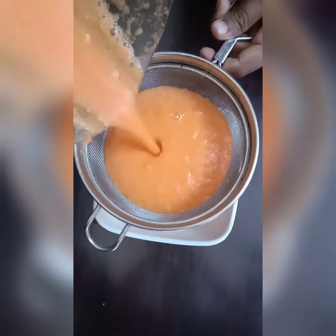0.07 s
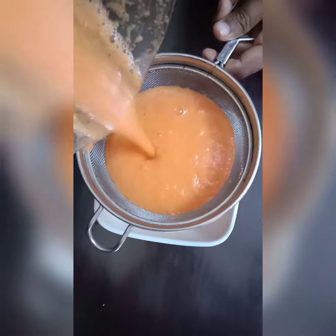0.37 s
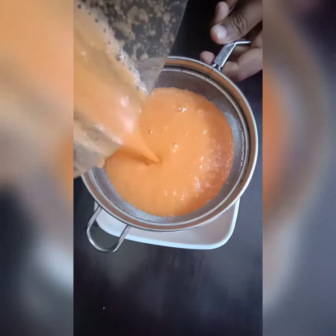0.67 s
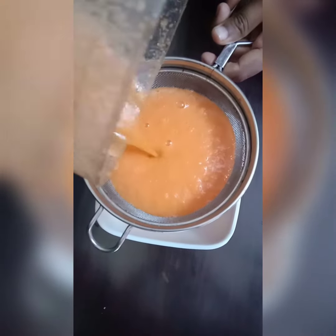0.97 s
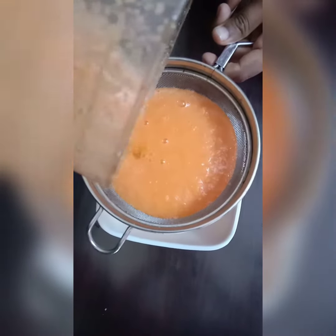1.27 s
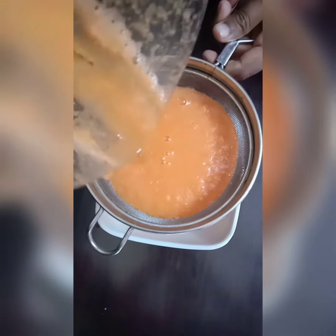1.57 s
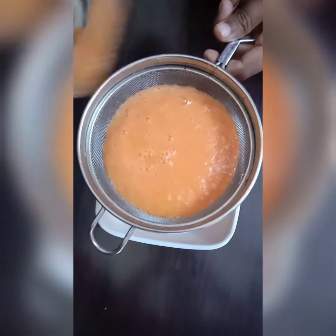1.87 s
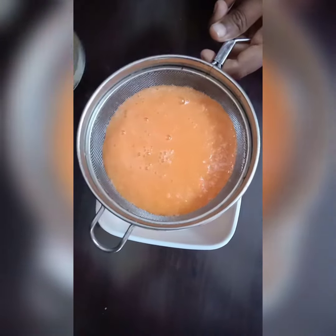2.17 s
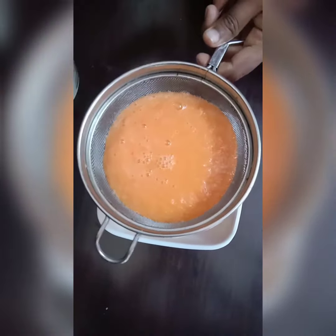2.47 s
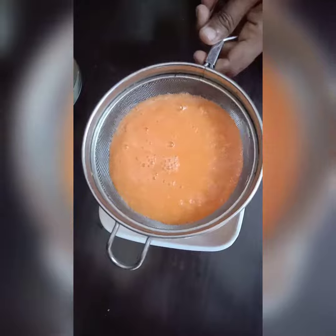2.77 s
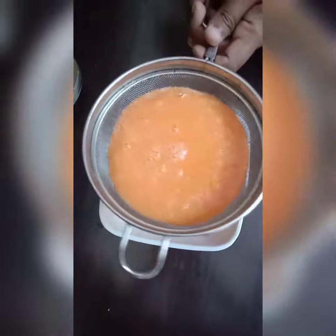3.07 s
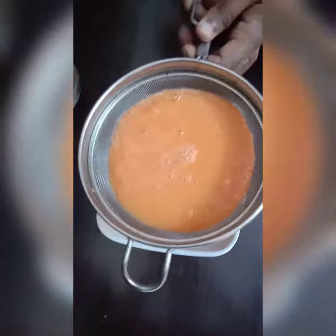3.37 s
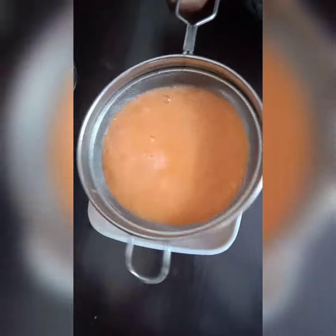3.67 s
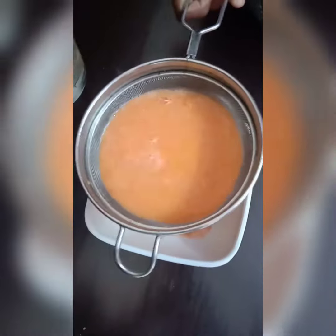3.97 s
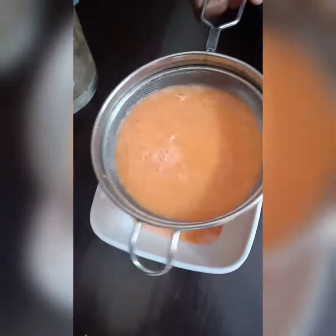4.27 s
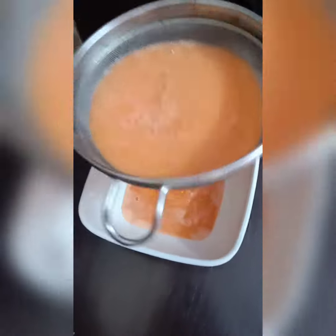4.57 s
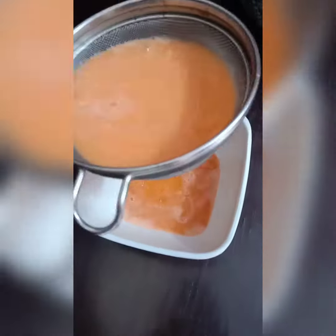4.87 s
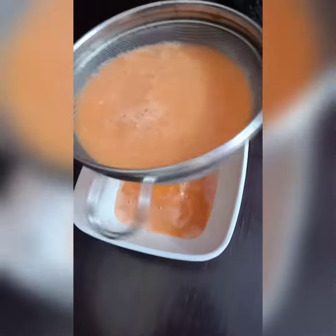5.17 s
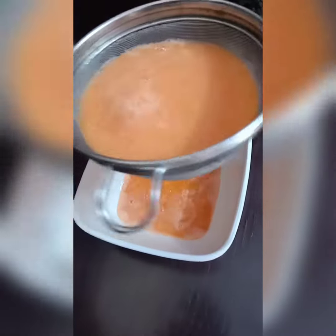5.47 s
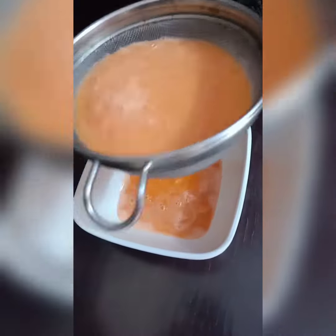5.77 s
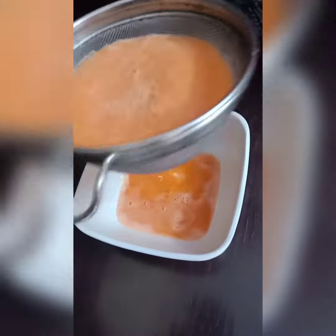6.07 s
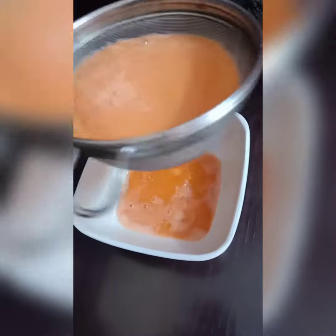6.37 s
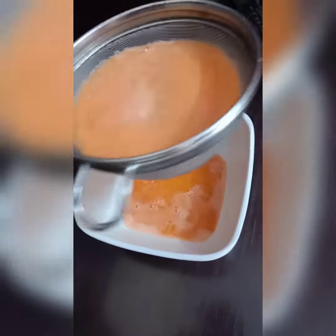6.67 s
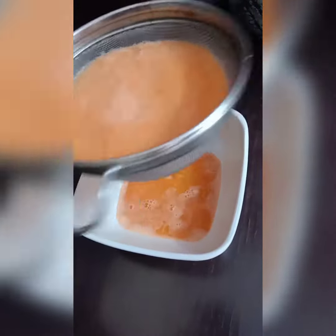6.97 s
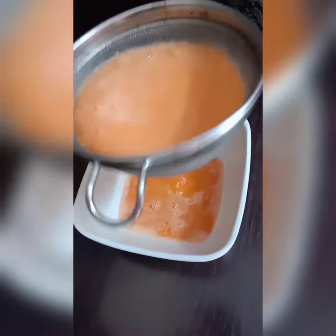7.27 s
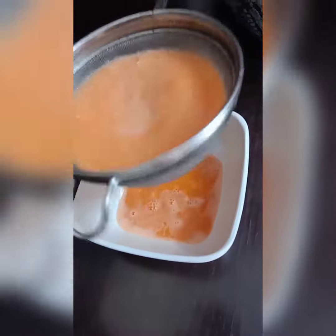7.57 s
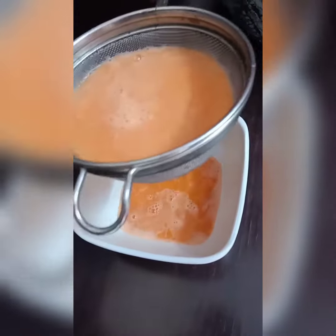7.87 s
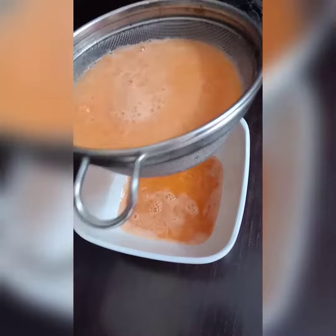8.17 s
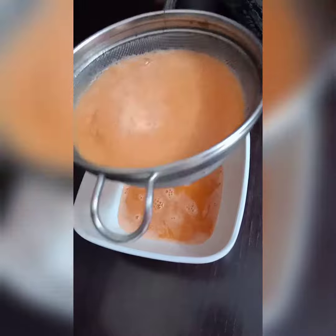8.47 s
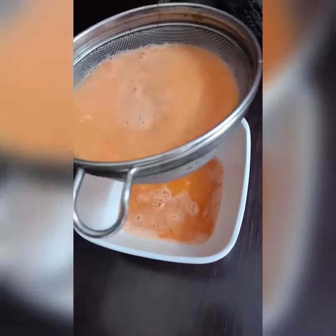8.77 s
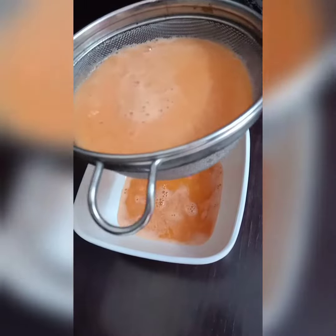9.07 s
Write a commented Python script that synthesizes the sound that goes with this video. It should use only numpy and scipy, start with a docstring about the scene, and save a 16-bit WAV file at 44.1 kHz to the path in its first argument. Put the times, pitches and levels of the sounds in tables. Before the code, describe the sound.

Thick juice pours through a metal strainer into a bowl, close to the microphone in a quiet, hard-walled kitchen. During the first second it gulps softly and squelches, with a short spray hiss near 0.4 seconds. A few drops and sharp foam ticks follow. From about 2.1 to 2.6 seconds the emptied jug thumps down and rocks on the table in a quick run of dull knocks, the loudest event. A brief high squeak comes at 2.8 seconds, a fainter one at 3.7. Irregular drops then splat and plip, lightly ringing the bowl, busiest between 4 and 5 seconds, with a stronger splat at 5.4. Wet pulp squelches around 6.5 seconds, mostly falling in pitch, followed by more splats. Lighter dripping continues until about 9 seconds. Fine foam crackle runs throughout over a faint low room hum, joined after the jug lands by a soft rumble from handling the strainer.

```python
"""Thick juice pouring through a metal strainer into a bowl, close to a phone microphone in a quiet,
hard-walled kitchen. The pour gulps and hisses, drops splat and ring the bowl, trapped bubbles plip,
foam films burst on the wet mesh, and the pulp squelches, mostly sinking in pitch. About two seconds
in, the emptied jug is set down, rocks on the table and squeaks. The strainer is then worked by hand
with a soft rumble and drips on, over a low room hum."""
import sys
import numpy as np
from scipy import signal
from scipy.fft import rfft, irfft
from scipy.io import wavfile
from scipy.ndimage import uniform_filter1d

SR = 44100
rng = np.random.default_rng(int(sys.argv[2]) if len(sys.argv) > 2 else 0)


def master(y):
    """Save y as 16-bit WAV."""
    cut = np.clip(np.atleast_2d(y).T, -1, 1)
    pcm = np.round(cut * 32767)  # scale
    wavfile.write(sys.argv[1], SR, pcm.astype(np.int16))


N = 406161
T = np.arange(N) / SR

# Levels in all tables are relative: each layer has its own gain.
# big drops landing in the bowl: t/s, splash level/dB, hollow body against the splash/dB
DROPS = [(1.227, -52.5, -8.5), (1.247, -52.5, -11.5), (1.33, -51.5, -7.5), (1.42, -55, -25),
         (2.861, -54, -2.5), (3.12, -47.5, -9), (3.206, -49.5, -8), (3.629, -52.5, -25),
         (3.765, -54.5, -2.5), (3.81, -53, -7), (3.855, -61.5, 6.5), (3.939, -54.5, -10.5),
         (4.039, -48.5, -13.5), (4.115, -44.5, -37), (4.256, -53.5, -2), (4.299, -50.5, 2),
         (4.353, -59, 11.5), (4.43, -45, -12.5), (4.454, -40, -8.5), (4.467, -48.5, -6), (4.483, -45, -8),
         (4.744, -53.5, 1), (4.759, -45.5, -1), (4.876, -44.5, -7), (4.9, -47.5, 2.5), (4.926, -43.5, -8),
         (4.944, -45, -4), (4.972, -51.5, 3.5), (5.003, -54, -0.5), (5.131, -50.5, -12), (5.436, -30, -11),
         (5.532, -59.5, 1), (5.796, -50.5, -3.5), (5.974, -64.5, 17), (6.221, -53, -5), (6.257, -49.5, 0.5),
         (6.269, -55, 3.0), (6.308, -56, 2.5), (6.509, -57, -24), (6.862, -43, -8.5), (6.941, -39, -4.5),
         (6.963, -54, 9.5), (7.152, -54, 4.5), (7.203, -61, 12.5), (7.393, -68.5, 16.5),
         (7.411, -64.5, 11.5), (7.484, -53, 5), (7.521, -48, -6.5), (7.587, -55.5, -14.5),
         (7.843, -50.5, -8.5), (7.856, -58, -13.0), (7.942, -56, -7), (7.964, -60.5, 9), (8.039, -66, 11.5),
         (8.091, -51.5, -16.0), (8.315, -50.5, 2), (8.46, -54.5, 3.5), (8.478, -53.5, 8.5),
         (8.511, -54, -1), (8.729, -54.5, 5), (8.765, -51, -6), (8.888, -67.5, 14.5), (9.055, -53, -4.5)]
# strength of the draining: t/s, patter level/dB, fizz level/dB
DRAINING = [(0, -34, -66.5), (0.33, -90, -77.5), (0.51, -54.5, -69), (0.97, -58.5, -66.5),
            (1.25, -54.5, -72), (1.61, -69, -58), (1.9, -59, -83.5), (2.13, -63.5, -87), (2.28, -63, -52.5),
            (2.48, -53.5, -83.5), (2.94, -55, -59.5), (3.41, -58.5, -69), (3.87, -59, -66.5),
            (4.48, -50, -63.5), (4.67, -60, -70), (4.9, -55, -56), (5.3, -48.5, -68.5),
            (5.64, -60.5, -74.5), (6.15, -71.5, -67), (6.45, -62, -60.5), (6.74, -56, -58.5),
            (7.07, -50.5, -62.5), (7.45, -58, -71), (7.75, -68, -65.5), (8.07, -44, -59),
            (8.27, -68.5, -74.5), (8.89, -47, -70.5), (9.2, -90, -95.5)]
# spectrum of juice landing: f/Hz, level/dB
SPLAT_SPECTRUM = [(300, -7), (750, -17), (1050, -0.5), (1700, 9), (2400, -2), (3100, 1), (4300, 2.5),
                  (5200, -14), (8000, -9), (10000, -26)]
# spectrum of bursting foam: f/Hz, level/dB
FOAM_SPECTRUM = [(3500, -18), (5500, -8.5), (7800, -3.5), (9500, -18.5), (11500, -22), (13000, -8.5),
                 (16000, -7.5)]


def amp(db):
    """Decibels to gain."""
    return 10 ** (np.asarray(db) / 20)


def unit(x):
    """Scale to rms 1."""
    return x / (np.std(x) + 1e-12)


def crest(x):
    """Scale to peak 1."""
    return x / (np.abs(x).max() + 1e-12)


def add(out, s, x):
    """Mix x into out from time s."""
    i = max(int(s * SR), 0)
    out[i:i + len(x)] += x[:N - i]


def curve(rows, column=1):
    """Gain that follows one dB column of a table over time."""
    rows = np.array(rows)
    return amp(np.interp(T, rows[:, 0], rows[:, column]))


def colour(x, points):
    """Shape x with a spectrum of points: f/Hz, level/dB."""
    hz, db = np.transpose(points)
    f = np.maximum(np.fft.rfftfreq(len(x), 1 / SR), 1)
    return irfft(rfft(x) * amp(np.interp(np.log(f), np.log(hz), db)), len(x))


def resonate(x, hz, width_hz):
    """Two-pole band-pass, gain 1 at the centre."""
    return signal.lfilter(*signal.iirpeak(hz, hz / width_hz, SR), x)


def fade(t, t60):
    """Exponential decay by 60 dB in t60 seconds."""
    return np.exp(-np.log(1000) * t / t60)


def wobble(t, samples):
    """Random motion of rms 1, smoothed over so many samples."""
    return unit(uniform_filter1d(rng.standard_normal(len(t)), samples))


def specks(per_s, spread_db, size=N):
    """Random tiny impacts, a few much larger than the rest."""
    strength = amp(spread_db * np.minimum(rng.exponential(size=size), 4))
    return (rng.random(size) < per_s / SR) * strength * rng.choice([-1, 1], size)


def spurts(depth_db):
    """Sticky pulp lets go irregularly: a gain that wanders over tens of milliseconds."""
    return amp(depth_db * unit(uniform_filter1d(wobble(T, 900), 500)))


def bubble(hz, t60, glide, attack_s):
    """A trapped bubble rings and rises in pitch as it nears the surface."""
    t = T[:4096]
    pitch = hz * (1 + glide * np.minimum(t / t60, 1))
    tone = np.sin(2 * np.pi * np.cumsum(pitch) / SR)
    return crest(tone * fade(t, t60) * (1 - np.exp(-t / attack_s)))


def tiny_bubbles(times, hz, gains, cycles):
    """Each bubble rings a few cycles of its own pitch with a rounded start."""
    turns = np.outer(hz, T[:400])
    age = turns / cycles
    waves = gains[:, None] * age * np.exp(-age) * np.sin(2 * np.pi * turns)
    place = (times * SR).astype(int)[:, None] + np.arange(turns.shape[1])
    return np.bincount(place.ravel(), waves.ravel(), N)[:N]


def bowl(x, stretch=1):
    """The hollow between bowl and strainer rings on after whatever lands in it."""
    # resonances of the hollow: f/Hz, width/Hz, level/dB
    modes = [(504, 25, 4), (1016, 32, 8.5), (1561, 20, 5.5), (1731, 35, -2), (1895, 29, 3.5), (2093, 30, 2),
             (2450, 77, -7.5), (2855, 52, -4), (3035, 52, 1.5), (3280, 61, -2.5), (3940, 120, -5),
             (4550, 140, -8)]
    return sum(amp(db) * resonate(x, hz * stretch, width) for hz, width, db in modes)


def room_hum(hz=99, width_hz=22):
    """A low hum wavers in the room: one narrow band of noise."""
    # course of the hum: t/s, level/dB
    levels = [(0, -65), (1, -69), (1.95, -69), (2.95, -73), (6.6, -63.5), (9.2, -78.5)]
    band = resonate(rng.standard_normal(N), hz, width_hz)
    return unit(resonate(band, hz, width_hz)) * curve(levels)


def still_air():
    """The kitchen's faint, steady room tone."""
    # spectrum of the air: f/Hz, level/dB
    spectrum = [(25, -3.5), (97, -0.5), (200, 3.5), (700, -14.5), (1000, -5), (1300, -18.5), (1700, 1),
                (2500, -41.5), (4400, 0.5), (5200, -32.5), (8000, -25), (10000, -36), (16000, -38.5)]
    return unit(colour(rng.standard_normal(N), spectrum))


def squelches(rise_share=0.28, skirt_db=-25, droop_db=-3, widening=0.22, surge_db=2.5):
    """Dense tiny pops ring a resonance that widens, and mostly sinks in pitch, as it dies away."""
    # squelches: t/s, length/s, starting f/Hz, sink/(octaves per s), width/Hz, level/dB
    events = [(0, 0.031, 3700, 0.5, 403, -43), (0.028, .16, 3920, 1.35, 454, -55.5),
              (0.272, 0.055, 4080, 1, 119, -59), (0.281, 0.12, 3410, 6, 230, -49.5),
              (0.538, 0.097, 3430, 0.8, 372, -42), (0.657, 0.24, 1813, 2.24, 237, -62.5),
              (1.368, 0.28, 3333, 2.5, 480, -50.5), (1.57, 0.09, 3100, 0.5, 302, -46),
              (1.616, .11, 3583, 1, 805, -46.5), (2.077, 0.17, 3684, 3, 418, -50),
              (2.205, 0.093, 3420, -1.5, 450, -48), (2.34, 0.12, 3494, 4, 387, -50.5),
              (2.566, 0.23, 5070, 2.4, 500, -48), (2.677, 0.12, 2402, 4, 656, -50),
              (2.935, 0.15, 3680, 4, 490, -45.5), (3.199, 0.072, 2857, 0.5, 703, -53),
              (3.78, .15, 2185, 0, 460, -60), (5.213, 0.13, 5034, 2.4, 340, -48.5),
              (5.768, 0.12, 3350, 5, 744, -56), (6.518, 0.038, 4470, 2.5, 260, -33),
              (6.566, 0.061, 3760, -0.4, 405, -35), (6.631, .14, 3717, 2.5, 590, -37.5),
              (7.215, 0.25, 2123, 1, 231, -58.5), (7.234, 0.13, 5390, 2.5, 380, -51),
              (7.725, 0.12, 1464, -0.5, 134, -67), (8.483, 0.069, 2580, 4.5, 600, -49),
              (8.87, 0.15, 5530, 3, 342, -57)]
    # spectrum over all squelches: f/Hz, level/dB
    spectrum = [(1000, -7.5), (1600, 2), (2400, -2), (3200, -2), (4400, 3), (5100, -6), (6000, 6)]
    out, t = np.zeros(N), T[:20480]
    for s, length, first_hz, sink, width, db in events:
        impacts = specks(per_s=1500, spread_db=2, size=len(t))
        pops = np.fft.fft(impacts * np.exp(2j * np.pi * rng.random(len(t))))
        # the band is built around 0 Hz, then carried up to the gliding pitch
        offset = np.fft.fftfreq(len(t), 1 / SR) / width
        narrow = np.fft.ifft(pops * (np.exp(-offset ** 2 / 2) + amp(skirt_db) * np.exp(-offset ** 2 / 20)))
        wide = np.fft.ifft(pops * np.exp(-offset ** 2 / 8))
        progress = np.minimum(t / length, 1)
        band = narrow + widening * progress * (wide - narrow)
        hz = first_hz * 2 ** (-sink * length * progress)
        hiss = (band * np.exp(2j * np.pi * np.cumsum(hz) / SR)).real
        surge = amp(surge_db * wobble(t, 350))
        swell = np.sin(np.pi / 2 * np.minimum(progress / rise_share, 1)) * amp(droop_db * progress)
        release = fade(np.maximum(t - length, 0), t60=0.092)
        add(out, s, amp(db) * unit(hiss * surge) * swell * release)
    return colour(out, spectrum)


def patter(ring_db=9):
    """Pulp crackles in sticky clusters and keeps the bowl faintly ringing."""
    impacts = specks(per_s=1300, spread_db=3.5) * spurts(depth_db=5.5)
    pops = colour(resonate(impacts, 2600, 4700), SPLAT_SPECTRUM)
    return unit(pops + amp(ring_db) * bowl(pops)) * curve(DRAINING, column=1)


def fizz(films, flurry_s=0.08):
    """Foam crackles on the mesh all the time, and in flurries where a film has burst."""
    when, pitch, size = rng.random((3, 3000))
    pops = tiny_bubbles(when * N / SR, 5000 * 3.1 ** pitch, (size + .03) ** -.6, cycles=1.8)
    bed = unit(colour(pops * spurts(depth_db=7.5), FOAM_SPECTRUM)) * curve(DRAINING, column=2)
    s, film_db, _ = np.repeat(films, 20, axis=0).T
    late, pitch = rng.random((len(s), 2)).T
    hz = 5000 + 10500 * pitch
    flurries = tiny_bubbles(s + flurry_s * late ** 2, hz, amp(film_db - 12 * late), cycles=1.6)
    return amp(-9) * bed + amp(-10) * colour(flurries, FOAM_SPECTRUM)


def gulps():
    """The falling stream traps larger bubbles, damped by the pulp."""
    # air pockets under the stream: t/s, level/dB, f/Hz
    pockets = [(0.024, -44, 900), (.146, -42.5, 750), (.185, -41.5, 770), (.203, -45, 1124),
               (.216, -45, 730), (.569, -44, 723)]
    out = np.zeros(N)
    for s, db, hz in pockets:
        add(out, s, amp(db) * bubble(hz, t60=0.012, glide=0.044, attack_s=0.0038))
    return out


def bursting_films(tears, max_lead_s=0.0104, spread_db=24, spread_octaves=0.33):
    """List the loudest film bursts, plus a few as drops tear off the mesh just before they land."""
    # films bursting in the foam and on the wet mesh: t/s, level/dB, f/Hz
    loudest = [(.0555, -30.5, 11300), (2.939, -46, 5960), (6.297, -45.5, 8600), (0.184, -46.5, 7200),
               (0.566, -40, 5430), (0.639, -38.5, 5170), (1.163, -43.5, 5200), (1.609, -40.5, 7730),
               (1.6318, -32.5, 6560), (1.713, -44, 7560), (2.161, -44, 7440), (2.339, -43, 4600),
               (3.0794, -37, 8350), (3.0989, -40, 8050), (3.511, -44.5, 5150), (3.63, -49, 5250),
               (3.862, -48, 5610), (4.1423, -44, 6430), (4.233, -48.5, 6350), (4.431, -39.5, 7830),
               (4.5481, -41.5, 6230), (4.583, -40.5, 7170), (4.715, -47.5, 7000), (4.744, -36, 5200),
               (5.182, -40.5, 5640), (5.229, -40, 4400), (5.252, -43, 6300), (5.4366, -41.5, 5660),
               (5.654, -48.5, 4830), (5.7062, -52, 7930), (5.9566, -49, 8200), (5.965, -45.5, 6400),
               (6.023, -46, 6160), (6.2372, -44, 6800), (6.509, -43, 5700), (6.578, -40, 8200),
               (6.6667, -39.5, 5370), (6.8505, -30, 5280), (6.8964, -37, 5230), (7.433, -44, 6450),
               (7.483, -36, 5540), (7.588, -43.5, 4860), (7.772, -44.5, 7380), (7.904, -48.5, 6450),
               (8.067, -50, 6700), (8.435, -47, 5310), (8.617, -47, 4920), (9.063, -48.5, 5700)]
    s, db, _ = np.transpose(DROPS)
    which, early, size, pitch = rng.random((tears, 4)).T
    drop = ((np.arange(tears) + which) / tears * len(s)).astype(int)
    tear_s = s[drop] - max_lead_s * early
    tear_db = db[drop] - 22 + spread_db * (2 * size - 1)
    tear_hz = 6330 * 2 ** (spread_octaves * (2 * pitch - 1))
    return np.vstack([loudest, np.column_stack([tear_s, tear_db, tear_hz])])


def ticks(films):
    """A film bursts: a sharp snap and a very short high ring."""
    out, t = np.zeros(N), T[:2048]
    for s, db, hz in films:
        burst = rng.standard_normal(len(t)) * fade(t, t60=0.012)
        snap = colour(np.roll(burst, 32), FOAM_SPECTRUM)
        ring = resonate(burst, hz, width_hz=0.057 * hz)
        add(out, s, amp(db) * crest(crest(ring) + crest(snap)))
    return out


def spray_rush(start_s=0.362, peak_s=0.4066, sag_s=0.075):
    """Dense spray hisses as the pour peaks: it swells fast, sags, then dies away."""
    # spectrum of the spray: f/Hz, level/dB
    spectrum = [(410, -92), (700, -60), (875, -26), (1140, -23), (1310, -11), (3110, 2), (3460, 0),
                (4320, 11), (5990, 9.5), (8310, -9), (9350, -26.5), (15000, -18), (16000, -51.5)]
    rise_db_per_s, sag_db_per_s, fall_db_per_s = 535, 92.5, 195
    spray = unit(colour(specks(per_s=5500, spread_db=5), spectrum))
    age = T - peak_s
    down_db = (rise_db_per_s * np.maximum(-age, 0) + sag_db_per_s * np.clip(age, 0, sag_s)
               + fall_db_per_s * np.maximum(age - sag_s, 0))
    return spray * amp(-down_db) * np.clip((T - start_s) / 0.038, 0, 1)


def plips(scatter=0.38):
    """Bubbles trapped by drops swell and are soon damped by the pulp, no two alike."""
    # trapped bubbles: t/s, level/dB, f/Hz
    trapped = [(1.164, -53.5, 4010), (1.423, -53, 4080), (2.561, -45.5, 1637), (2.86, -40.0, 1701),
               (3.631, -45, 3180), (3.765, -48.5, 1910), (3.905, -55.5, 1360), (4.041, -42.5, 2896),
               (4.116, -49.0, 2880), (4.258, -47, 3000), (4.299, -43, 3106), (4.329, -49.5, 2720),
               (4.354, -45.5, 1550), (4.454, -41, 2850), (4.482, -39.5, 2800), (4.698, -51, 3310),
               (4.744, -51, 2050), (4.758, -44, 1900), (4.877, -53, 3300), (4.944, -41, 2086),
               (5.533, -51, 1565), (5.976, -53.5, 1840), (6.308, -51.5, 2710), (6.51, -55, 4240),
               (6.861, -52, 3040), (6.963, -42.0, 1567), (7.151, -50.5, 1510), (7.202, -45, 2120),
               (7.392, -47.5, 1143), (7.484, -49.5, 4516), (7.522, -50, 3430), (7.945, -53.0, 3020),
               (7.964, -51, 3900), (8.039, -51, 3130), (8.089, -50.5, 4280), (8.459, -52.5, 1600),
               (8.553, -50, 2070), (8.648, -50.5, 1068), (8.729, -45, 2083), (8.888, -51, 1790)]
    out = np.zeros(N)
    for s, db, hz in trapped:
        life, rise = np.exp(scatter * rng.standard_normal(2))
        add(out, s, amp(db) * bubble(hz, t60=0.026 * life, glide=0.049 * rise, attack_s=0.002))
    return out


def drops(grain_db=3.5, spatter_db=-22, ring_db=13, pat_db=-25, attack_s=0.0023, pad_s=0.016):
    """Thick juice takes each drop softly: a rough splat that rings the bowl, and a low pat."""
    out, t = np.zeros(N), np.maximum(T[:12288] - pad_s, 0)
    for s, db, body_db in DROPS:
        rough_noise = rng.standard_normal(len(t)) * amp(grain_db * wobble(t, 110))
        decay = fade(t, t60=0.068) + amp(spatter_db) * fade(t, t60=0.38)
        spray = rough_noise * decay * (1 - np.exp(-t / attack_s))
        stretch = 1 + 0.027 * rng.standard_normal()  # the resonances shift as the strainer moves
        splat = colour(spray + amp(ring_db) * bowl(spray, stretch), SPLAT_SPECTRUM)
        body = colour(splat, [(2000, 0), (2700, -20)])
        pat = resonate(resonate(spray, 230, 405), 230, 405)
        hollow = unit(body) + amp(pat_db) * unit(pat)
        add(out, s - pad_s, amp(db) * (unit(splat - body) + amp(body_db) * hollow))
    return out


def mesh_crackle(linger_s=0.0087):
    """Every drop that leaves the mesh tears tiny films there, which crackle for a moment."""
    s, drop_db, _ = np.repeat(DROPS, 40, axis=0).T
    late, pitch, size = rng.random((len(s), 3)).T
    times = s - linger_s * np.log(late + .01)
    pops = tiny_bubbles(times, 5000 + 11000 * pitch, amp(drop_db + 16 * size ** 3), cycles=1.5)
    return colour(pops, FOAM_SPECTRUM)


def struck(modes, t, contact_ms):
    """Modes ring after a blow; a longer contact leaves mainly the low ones."""
    return sum(amp(db) * np.sin(2 * np.pi * hz * t) * fade(t, t60) / (1 + (hz * contact_ms / 1000) ** 2)
               for hz, db, t60 in modes)


def jug_set_down(thud_db=-13, rattle_db=-20):
    """The jug lands and rocks: each blow rings table and jug, and the base chatters on the wood."""
    # blows: t/s, table level/dB, jug level/dB, contact/ms
    blows = [(2.069, -23, -14.5, 3.1), (2.0787, -24.1, -33, 0.5), (2.1366, -29, -23, 2.6),
             (2.1619, -19, -21, 4), (2.201, -45, -25, 4), (2.2336, -23.5, -36, 2.2),
             (2.2993, -14, -17.5, 2.7), (2.337, -20.5, -36.5, 1.6), (2.3717, -18.5, -34.5, 2.4),
             (2.4315, -21.5, -62, 3.5), (2.477, -29.7, -43.5, 2.1), (2.5737, -42.5, -49.5, 1.4)]
    # modes of the table top: f/Hz, level/dB, t60/s
    table_modes = [(107.1, -12.4, 0.37), (123.4, 1, 0.35)]
    # modes of the jug: f/Hz, level/dB, t60/s
    jug_modes = [(162.9, -9.5, 0.57), (194, -7.5, 0.27), (261.4, -7, 0.16), (305, -12, 0.37),
                 (451.6, -13.5, .18), (518, -22, 0.31), (704, -13.5, 0.195)]
    # spectrum of the thud: f/Hz, level/dB
    thud_spectrum = [(40, -33), (70, -23.5), (100, -11), (180, 3.5), (300, -7), (400, -22.5), (500, -12),
                     (850, -19.5), (2500, -30.5), (4500, -40), (9000, -65.5)]
    out, t = np.zeros(N), T[:SR]
    for s, table_db, jug_db, contact_ms in blows:
        thud = unit(colour(rng.standard_normal(len(t)), thud_spectrum))
        thud *= fade(t, t60=0.28) * np.minimum(t / .002, 1)
        impacts = specks(per_s=660, spread_db=5, size=len(t))
        chatter = resonate(resonate(impacts, 1000, 1300), 1000, 1900)
        rattle = crest(chatter * fade(t, t60=0.081))
        jug = struck(jug_modes, t, contact_ms) + amp(thud_db) * thud + amp(rattle_db) * rattle
        add(out, s, -amp(table_db) * struck(table_modes, t, contact_ms) - amp(jug_db) * jug)
    # little of the knocks sounds below about 80 Hz
    return signal.sosfilt(signal.butter(4, 80, "high", fs=SR, output="sos"), out)


def squeaks(waver=0.028):
    """Brief stick-slip squeals, unsteady in pitch."""
    # slips: t/s, length/s, f/Hz, level/dB, overtones against the fundamental/dB
    slips = [(2.76, 0.067, 2495, -36, -4), (3.718, 0.049, 2520, -51, -46)]
    out, t = np.zeros(N), T[:8192]
    for s, length, hz, db, overtone_db in slips:
        phase = 2 * np.pi * np.cumsum(hz * (1 + waver * wobble(t, 120))) / SR
        overtones = np.sin(2 * phase) + amp(-16.5) * np.sin(3 * phase)
        gate = np.clip(t / 0.00086, 0, 1) * np.clip((length - t) / 0.004, 0, 1)
        add(out, s, amp(db) * (np.sin(phase) + amp(overtone_db) * overtones) * gate)
    return out


def handling(start_s=2):
    """A soft rumble while the strainer is worked by hand."""
    # course of the rumble: t/s, level/dB
    levels = [(2.9, -75.5), (3.55, -109.5), (4.95, -65.5), (6.44, -75), (6.58, -60), (8.43, -90),
              (8.48, -84), (9.2, -105)]
    # spectrum of the rumble: f/Hz, level/dB
    spectrum = [(35, -12), (60, -4.5), (97, -20.5), (130, 5.5), (307, -1), (412, -31.5), (488, -4.5),
                (786, -43.5), (900, -3.5), (1170, -36.5), (1980, -120)]
    return unit(colour(rng.standard_normal(N), spectrum)) * curve(levels) * np.clip(T - start_s, 0, 1)


def kitchen(x, near_db, far_db, far_t60=0.32):
    """At the microphone: direct sound, reflections off nearby table and utensils, then the hard walls."""
    t = T[:SR * 3 // 4]
    near, far = rng.standard_normal((2, len(t)))
    near = near * fade(t, t60=0.049) * (t > .001)
    far = colour(far, [(100, 5), (4500, -14), (8000, -7), (15000, -17.5)]) * fade(t, far_t60) * (t > .006)
    echo = amp(near_db) * near / np.linalg.norm(near) + amp(far_db) * far / np.linalg.norm(far)
    return x + signal.fftconvolve(x, echo)[:N]


def scene():
    """One microphone position: juice and jug close and fairly dry, more room on foam and hisses."""
    films, squelch = bursting_films(tears=6), squelches()
    liquid = amp(-10) * drops() + amp(12) * plips() + gulps() + amp(-9) * patter()
    liquid = kitchen(liquid, near_db=-7.5, far_db=-9.5)
    foam = ticks(films) + fizz(films) + amp(-18) * mesh_crackle()
    foam = kitchen(foam, near_db=-1.5, far_db=-7)
    hisses = amp(-3) * (squelch + amp(-7) * bowl(squelch)) + amp(-26.5) * spray_rush()
    hisses = kitchen(hisses, near_db=2.5, far_db=-3.5, far_t60=0.42)
    knocks = kitchen(jug_set_down(), near_db=-9.5, far_db=-25.5)
    squeals = kitchen(squeaks(), near_db=-6.5, far_db=-0.5)
    background = amp(-2) * room_hum() + amp(-3) * handling() + amp(-78) * still_air()
    return (amp(-3.5) * liquid + amp(6) * foam + hisses + knocks + amp(-4) * squeals + background)[None]


def record(dry):
    """The phone cuts the top steeply above 16.2 kHz."""
    return signal.sosfilt(signal.ellip(10, .2, 80, 16200, fs=SR, output="sos"), dry)


dry = scene()
out = record(dry)
master(out)
```